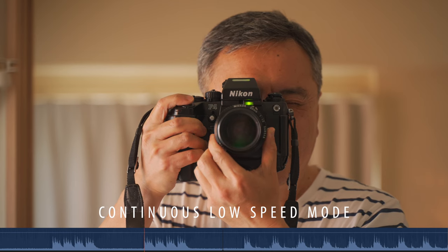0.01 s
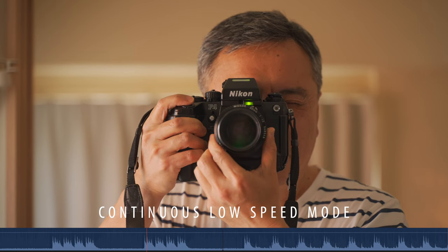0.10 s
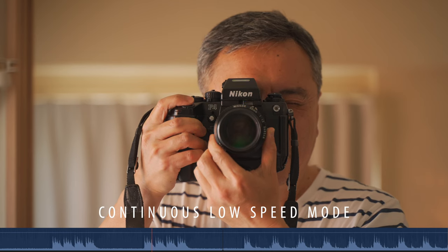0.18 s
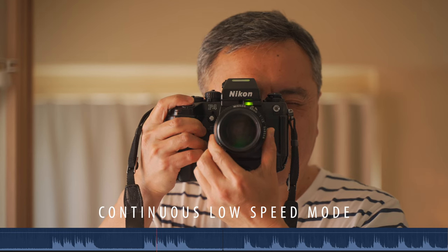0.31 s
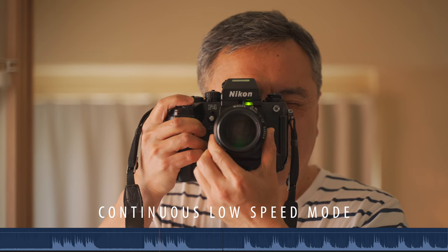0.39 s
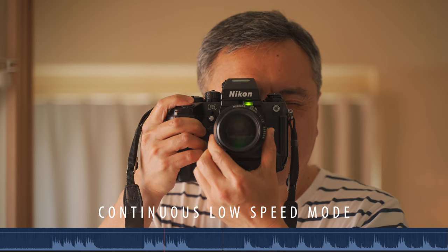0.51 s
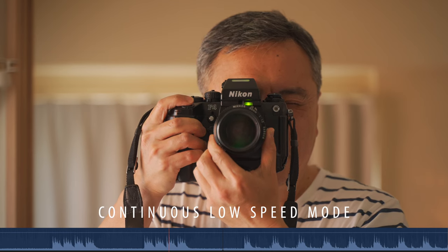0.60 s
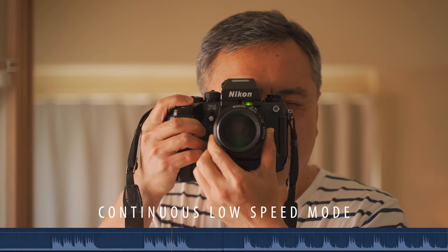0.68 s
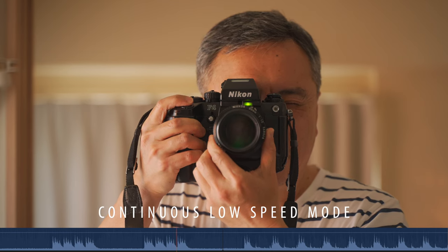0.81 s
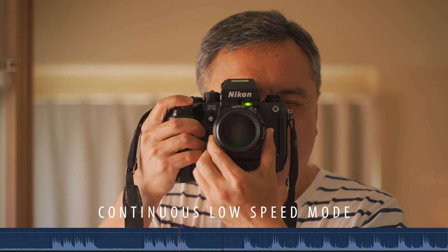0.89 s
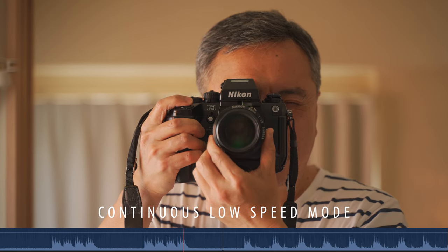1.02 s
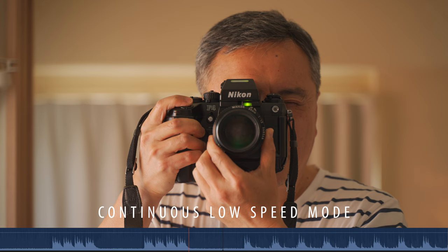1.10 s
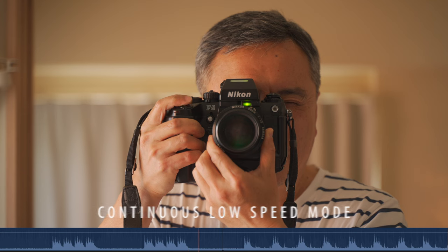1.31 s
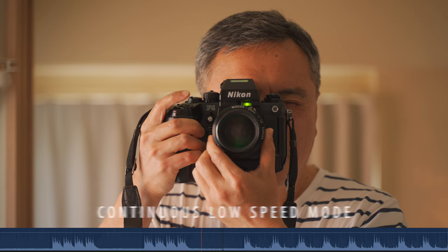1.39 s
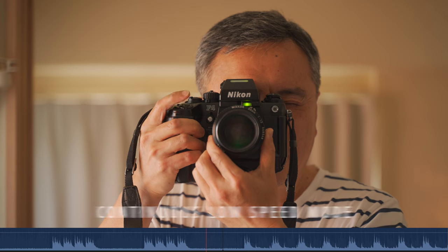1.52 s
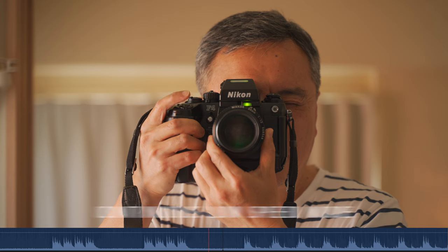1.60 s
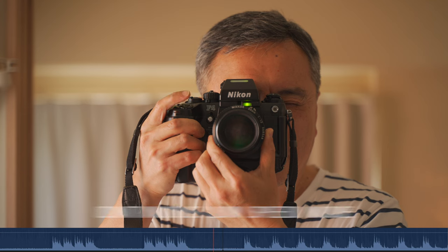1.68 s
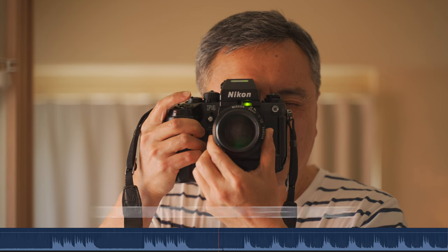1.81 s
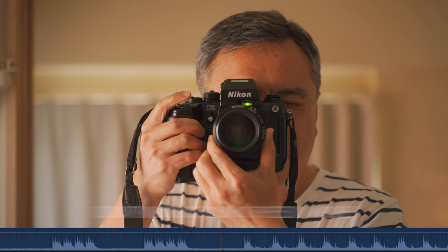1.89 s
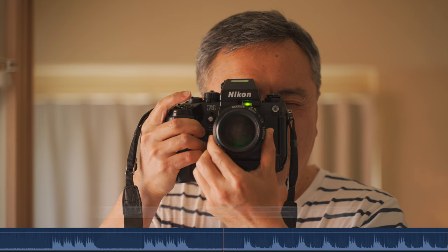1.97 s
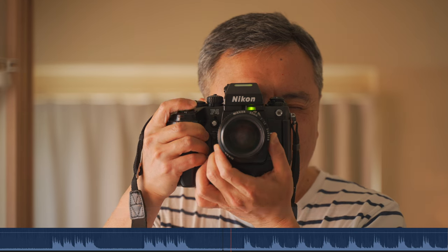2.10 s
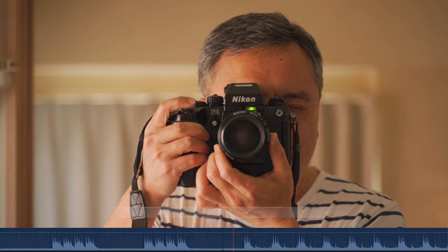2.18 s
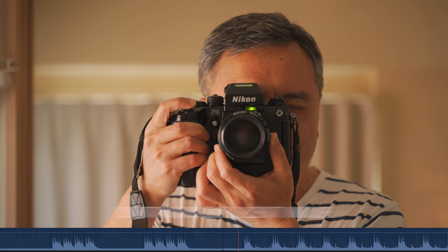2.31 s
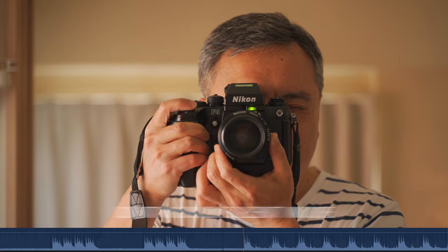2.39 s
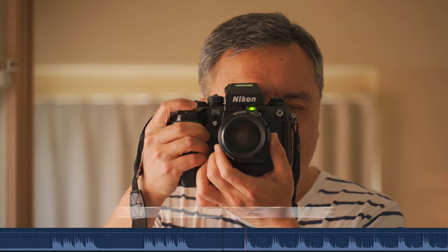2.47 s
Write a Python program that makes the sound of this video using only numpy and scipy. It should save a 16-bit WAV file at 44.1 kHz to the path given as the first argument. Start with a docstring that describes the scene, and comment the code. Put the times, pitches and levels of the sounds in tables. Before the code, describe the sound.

A motor-driven film camera, close by in a small quiet room, fires four nearly identical shots at about 0.24, 0.51, 0.78 and 1.05 seconds. Each is a bright metallic clack, shutter rattle, short grainy winder whirr with a gear click, and closing latch, with a short room echo. After 1.3 seconds only low room rush, faint drones and hiss remain, with tiny handling ticks near 1.45 and 2.2 seconds.

```python
"""A small quiet room is heard first: a low rush, unsteady drones and hiss, all shaped from noise.
Close by, a motor-driven film camera then fires four frames. In each, release and mirror clack, shutter
blades rattle shut, the winder starts to run, a gear engages during the run, and the mirror drive latches.
Contacts are noise bursts with decaying sine waves for the ringing; the winder is random tooth clicks and
noise; the walls answer. Much of each stage's clatter repeats. A few faint handling ticks follow."""
import sys
import numpy as np
from scipy import signal
from scipy.fft import rfft, irfft, next_fast_len
from scipy.io import wavfile
from scipy.ndimage import uniform_filter1d, map_coordinates

SR = 44100
rng = np.random.default_rng(int(sys.argv[2]) if len(sys.argv) > 2 else 0)


def makeup_ratio(level_db):
    """Linear amplitude ratio for a level in decibels (20 dB per factor of ten)."""
    decades = np.asarray(level_db, float) / 20
    return 10 ** decades


def wrap_up_sound(samples):
    """Save the sound to the file named by the first command line argument, as 16-bit audio."""
    columns = np.atleast_2d(samples).T
    # keep every value between -1 and 1, then stretch to whole-number steps
    tamed = np.clip(columns, -1, 1)
    steps = np.round(tamed * 32767).astype(np.int16)
    wavfile.write(sys.argv[1], SR, steps)


N = 110250

# Rush of the room, its colour: pitch_hz, relative level_db
RUSH_COLOUR = [(15, -44), (25, -8), (102, -1.5), (150, -2.5), (212, -6.5), (337, -6), (525, -7.5),
               (624, -7.5), (2500, -26), (3250, -45), (5500, -120)]
# Slow change of the rush: time_s, change_db
RUSH_SWELL = [(0, 1), (1.5, 1), (2.5, 0.5)]
# Drones in the room: pitch_hz, width_hz, level_db before swells and wobble
DRONES = [(55, 12, -60.5), (98.8, 8.2, -58.5), (215, 12, -63), (497, 94, -60), (899, 13, -70.5)]
# Swell of the low drones: time_s, change_db
DRONE_SWELL = [(0, -6), (.3, 1.5), (.6, -6), (1.3, 0.5), (1.55, -1), (2.08, -4.5), (2.24, 9), (2.5, 0.5)]
# Microphone hiss, its colour: pitch_hz, relative level_db
HISS_COLOUR = [(880, -8), (1500, -1), (1830, -7), (6370, -12), (14300, -14), (16000, -21)]
RUSH_DB, HISS_DB = -53.5, -64  # the rush level is before its swell and wobble

# Faint handling ticks: start_s, starting level_db, pitch_hz, width_hz
HANDLING_TICKS = [(1.436, -58, 8100, 1510), (2.159, -58, 4470, 4000), (2.224, -67.5, 7500, 2000)]
TICK_T60_S = 0.058  # time to fall by 60 dB

# How long the room's echo lasts: pitch_hz, time to fall by 60 dB in s
ROOM_DECAY = [(300, 0.38), (1000, .32), (3000, 0.34), (8000, 0.32), (15000, 0.16)]
ROOM_DB, ROOM_DELAY_S = -4.5, 0.004
RING_IN_ROOM_DB = -11  # the ringing reaches the walls weaker than the chatter

# Each stage in the four frames: start_s, level_db of the chatter's loudest moment before the echo
RELEASE_TIMES = [(0.2435, -20), (0.5115, -20), (0.78, -20.5), (1.0487, -20)]
SHUTTER_TIMES = [(0.2996, -19), (0.5671, -18.5), (0.8362, -19), (1.1054, -18.5)]
GEAR_TIMES = [(0.3462, -22.5), (0.6145, -22.5), (0.8815, -21.5), (1.1509, -21.5)]
LATCH_TIMES = [(0.408, -22.5), (0.6759, -22), (0.9445, -23.5), (1.2129, -23.5)]
# Contacts in a stage: delay_s, relative level_db before chance, rise_s, time to fall by 60 dB in s
RELEASE_CONTACTS = [(-.0035, -21, .0004, .05), (-.0004, 0, .0006, .024), (.006, -8, .001, .07),
                    (.014, -11, .001, .05), (.026, -15, .002, .08), (.035, -15, .001, .04)]
SHUTTER_CONTACTS = [(-.0055, -9, .002, .08), (-.0008, -3, .0008, .04), (.002, -1, .0005, .03),
                    (.008, -5, .0008, .03), (.016, -10, .001, .03)]
GEAR_CONTACTS = [(.0003, 0, .0004, .045), (.009, -6, .0008, .025), (.0185, -5, .0004, .012),
                 (.0245, -8, .001, .03)]
LATCH_CONTACTS = [(-.012, -12, .001, .02), (-.004, -5, .001, .07), (.001, 0, .0006, .035),
                  (.007, -6, .001, .03), (.016, -8, .001, .04)]
# Ringing parts: pitch_hz, relative level_db before chance, time to fall by 60 dB in s
RELEASE_PARTS = [(780, -19, .07), (900, -16, .08), (1300, -16, .05), (2050, -12, .04), (2740, 0, .03),
                 (3540, -12, .03), (4700, -10, .025), (6400, -7, .055), (7240, -8, .03), (9070, -8, .035)]
SHUTTER_PARTS = [(880, -8, .06), (2040, -4, .06), (2350, -6, .04), (3900, -4, .025), (4450, -1, .025),
                 (5240, -5, .03), (6500, -3, .03), (8800, -5, .03), (13000, -10, .02)]
GEAR_PARTS = [(1300, -14, .04), (1620, -9, .06), (2120, -13, .04), (2790, 0, .055), (3020, -6, .04),
              (8150, -8, .04), (10100, -8, .04)]
LATCH_PARTS = [(520, -8, .12), (900, -9, .12), (1600, -6, .08), (2290, -3, .06), (2800, -4, .04),
               (4800, -5, .03), (6700, 0, .035), (9000, -7, .03)]
# Ringing parts of the running winder: pitch_hz, width_hz, relative level_db
WINDER_PARTS = [(906, 20, 6), (1614, 87, -2), (2350, 80, 0), (2850, 53, -6.5)]
# Broad colour of contacts and winder: pitch_hz, relative level_db
RELEASE_COLOUR = [(200, -34.5), (600, -17.5), (1000, -3.5), (2500, -2), (6000, -4), (9000, -2.5),
                  (13000, -9.5), (16000, -26.5)]
SHUTTER_COLOUR = [(200, -46), (400, -10), (1000, -7.5), (2500, -3.5), (5000, -0.5), (9000, -3.5),
                  (13000, -13), (16000, -25)]
GEAR_COLOUR = [(200, -27), (500, -36.5), (1200, -11), (2800, 1.5), (5000, -7.5), (9000, -7), (13000, -13),
               (16000, -26)]
LATCH_COLOUR = [(200, -41), (450, -10.5), (1000, -4), (2500, -2), (5000, -3), (8000, -2), (12000, -12),
                (16000, -21)]
WINDER_COLOUR = [(200, -22.5), (500, -11.5), (1000, -1), (2500, 1.5), (5000, -5), (9000, -7),
                 (13000, -15.5), (16000, -23)]
# Ringing against chatter, for release, shutter, gear, latch: level_db
RING_LEVELS = (1, -5, 1, -3)

SAMENESS = 0.6  # share of the raw chatter's power kept between frames
CHATTER_SPREAD_DB, TOOTH_SPREAD_DB = 2, 2
RING_RISE_CYCLES = 1.9  # time constant of each part's swell, in its own cycles
WINDER_START_S, WINDER_STOP_S, WINDER_RAMP_S = 0.065, 0.1693, 0.024  # start and stop: after the release
WINDER_DB, WINDER_RING_DB = -33, -1.5  # level before wobble and ramps; ringing against broad colour
TEETH_PER_S = 2500  # on average
TOP_HZ = 15900


def unit(x):
    """Scale to an rms of 1."""
    return x / np.sqrt(np.mean(x ** 2) + 1e-20)


def peak_one(x):
    """Scale so that the loudest 2.5 ms has an rms of 1."""
    return x / np.sqrt(uniform_filter1d(x ** 2, size=SR // 400).max())


def along(points, hz):
    """Read values between table points, with pitch on a log axis."""
    point_hz, value = np.transpose(points)
    return np.interp(np.log(hz + 1), np.log(point_hz + 1), value)


def filtered(x, response):
    """Multiply the spectrum by a response that depends on frequency."""
    size = next_fast_len(x.shape[-1] + 8192)
    spectrum = rfft(x, size) * response(np.fft.rfftfreq(size, 1 / SR))
    return irfft(spectrum, size)[..., :x.shape[-1]]


def colour(tone):
    """Broad colour that never sounds before its cause (minimum phase, by folding the cepstrum)."""
    def response(f):
        cepstrum = irfft(np.log(np.maximum(makeup_ratio(along(tone, f)), 1e-6)))
        cepstrum[1:len(cepstrum) // 2] *= 2
        cepstrum[len(cepstrum) // 2 + 1:] = 0
        return np.exp(rfft(cepstrum))
    return response


def modes(parts):
    """Resonances of ringing parts, added with alternating sign."""
    def response(f):
        total = 0
        for k, (hz, width_hz, db) in enumerate(parts):
            damping = 1j * f * width_hz
            total = total + (-1) ** k * makeup_ratio(db) * damping / (hz * hz - f * f + damping)
        return total
    return response


def wobble(rate):
    """A smooth random curve through this many random points a second."""
    points = rng.standard_normal(int(N * rate / SR) + 4)
    return map_coordinates(points, [np.arange(N) * rate / SR])


def swell(points):
    """Turn a table of level changes into a gain over time."""
    return makeup_ratio(np.interp(np.arange(N) / SR, *np.transpose(points)))


def rush():
    """Low rush of the room: coloured noise with a slowly wandering level."""
    noise = unit(filtered(rng.standard_normal(N), lambda f: makeup_ratio(along(RUSH_COLOUR, f))))
    return swell(RUSH_SWELL) * makeup_ratio(RUSH_DB + 0.52 * wobble(5.95)) * noise


def drones():
    """Unsteady drones: noise in narrow bands, of which those below 300 Hz also swell."""
    total, low_swell = np.zeros(N), swell(DRONE_SWELL)
    for hz, width_hz, db in DRONES:
        band = unit(filtered(rng.standard_normal(N), lambda f: 1 / (1 + (2 * (f - hz) / width_hz) ** 2)))
        gain = makeup_ratio(db + 0.77 * wobble(2.9))
        total += (low_swell if hz < 300 else 1) * gain * band
    return total


def hiss():
    """Microphone hiss: steady coloured noise."""
    return makeup_ratio(HISS_DB) * unit(filtered(rng.standard_normal(N), lambda f: makeup_ratio(along(HISS_COLOUR, f))))


def handling():
    """Faint ticks of fingers and strap on the camera: short fading bands of noise."""
    out, t = np.zeros(N), np.arange(SR // 10) / SR
    for start_s, db, hz, width_hz in HANDLING_TICKS:
        noise = rng.standard_normal(len(t))
        band = unit(filtered(noise, lambda f: np.exp(-((f - hz) / width_hz) ** 2)))
        out[round(start_s * SR):][:len(t)] += makeup_ratio(db - 60 * t / TICK_T60_S) * band
    return out


def room(x):
    """Echo of the walls: a noise tail in which each frequency dies at its own speed."""
    hz, t, grains = signal.stft(rng.standard_normal(SR // 2), SR, nperseg=256)
    fade = makeup_ratio(-60 * t / along(ROOM_DECAY, hz)[:, None])
    tail = signal.istft(grains * fade, SR, nperseg=256)[1]
    tail = tail / np.linalg.norm(tail)
    delayed = np.pad(x, (round(ROOM_DELAY_S * SR), 0))
    return makeup_ratio(ROOM_DB) * signal.fftconvolve(delayed, tail)[:N]


def winder():
    """Gear teeth of the film advance chatter while the motor runs: random clicks and noise."""
    t, run = np.arange(N) / SR, np.zeros(N)
    for start_s, _ in RELEASE_TIMES:
        ramp_up = np.clip((t - start_s - WINDER_START_S) / WINDER_RAMP_S, 0, 1)
        ramp_down = np.clip((start_s + WINDER_STOP_S - t) / WINDER_RAMP_S, 0, 1)
        run += ramp_up * ramp_down
    struck = rng.random(N) < TEETH_PER_S / SR
    strength = rng.standard_normal(N) * makeup_ratio(TOOTH_SPREAD_DB * rng.standard_normal(N))
    teeth = unit(struck * strength) + rng.standard_normal(N)
    broad, ring = colour(WINDER_COLOUR), modes(WINDER_PARTS)
    gears = unit(filtered(teeth, lambda f: broad(f) + makeup_ratio(WINDER_RING_DB) * ring(f)))
    gears = makeup_ratio(WINDER_DB + 2.3 * wobble(250)) * run * gears
    return gears + room(gears)


def spiky(length):
    """Noise whose strength also varies by chance from sample to sample."""
    return rng.standard_normal(length) * makeup_ratio(CHATTER_SPREAD_DB * rng.standard_normal(length))


def contact_envelope(t, contacts):
    """Each contact rises fast and dies away; their powers add."""
    power = np.zeros(len(t))
    for delay_s, db, rise_s, t60_s in contacts:
        age = np.maximum(t - delay_s, 0)
        fade = makeup_ratio(db + rng.normal(0, 1) - 60 * age / t60_s)
        power += (fade * (1 - np.exp(-age / rise_s))) ** 2
    return np.sqrt(power)


def ringing_parts(t, parts, phases):
    """Parts ring as sine waves that swell, then die away."""
    age, total = np.maximum(t, 0), np.zeros(len(t))
    for (hz, db, t60_s), phase in zip(parts, phases):
        fade = makeup_ratio(db + rng.normal(0, 1) - 60 * age / t60_s)
        rise = 1 - np.exp(-age * hz / RING_RISE_CYCLES)
        total += fade * rise * np.sin(2 * np.pi * (hz * age + phase))
    return total


def stage(times, contacts, tone, parts, ring_db):
    """A cluster of contacts, each a burst of chatter; the main one sets the parts ringing."""
    near, far = np.zeros(N), np.zeros(N)
    lead = SR // 50  # room for contacts ahead of the main one
    t = (np.arange(SR // 6) - lead) / SR
    kept, phases = spiky(len(t)), rng.random(len(parts))  # the same in every frame
    for start_s, db in times:
        raw = np.sqrt(SAMENESS) * kept + np.sqrt(1 - SAMENESS) * spiky(len(t))
        chatter = peak_one(filtered(contact_envelope(t, contacts) * raw, colour(tone)))
        ringing = makeup_ratio(ring_db) * peak_one(ringing_parts(t, parts, phases))
        first = round(start_s * SR) - lead
        near[first:][:len(t)] += makeup_ratio(db) * (chatter + ringing)
        far[first:][:len(t)] += makeup_ratio(db) * (chatter + makeup_ratio(RING_IN_ROOM_DB) * ringing)
    return near + room(far)


def latch():
    """The mirror drive latches: a cluster of contacts with ringing parts."""
    return stage(LATCH_TIMES, LATCH_CONTACTS, LATCH_COLOUR, LATCH_PARTS, RING_LEVELS[3])


def gear():
    """A gear engages while the winder runs: a cluster of contacts with ringing parts."""
    return stage(GEAR_TIMES, GEAR_CONTACTS, GEAR_COLOUR, GEAR_PARTS, RING_LEVELS[2])


def shutter():
    """The shutter blades rattle shut: a cluster of contacts with ringing parts."""
    return stage(SHUTTER_TIMES, SHUTTER_CONTACTS, SHUTTER_COLOUR, SHUTTER_PARTS, RING_LEVELS[1])


def release():
    """Release and mirror clack: a cluster of contacts with ringing parts."""
    return stage(RELEASE_TIMES, RELEASE_CONTACTS, RELEASE_COLOUR, RELEASE_PARTS, RING_LEVELS[0])


def scene():
    """The background, and the camera with its echo in the room."""
    background = rush() + drones() + hiss()
    camera = winder() + latch() + gear() + shutter() + release()
    return (background + handling() + camera)[None]


def roll_off(x):
    """The treble ends steeply here."""
    return signal.sosfilt(signal.butter(12, 16630, fs=SR, output="sos"), x)


def record(dry):
    """The recorder's band limit: a steep cut of the highest treble."""
    mix = filtered(dry, lambda f: 1 / (1 + (f / TOP_HZ) ** 60))
    return roll_off(mix)


dry = scene()
out = record(dry)
wrap_up_sound(out)
```